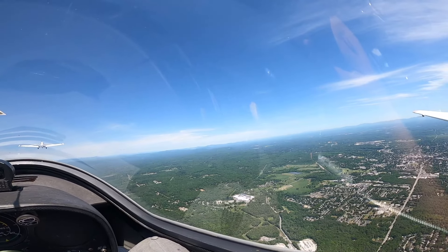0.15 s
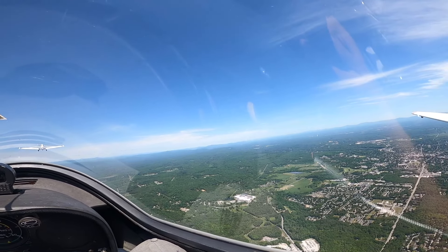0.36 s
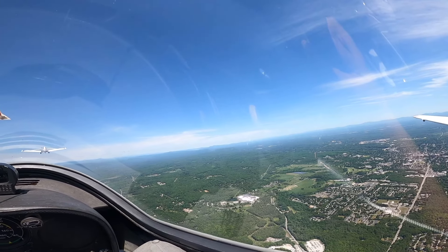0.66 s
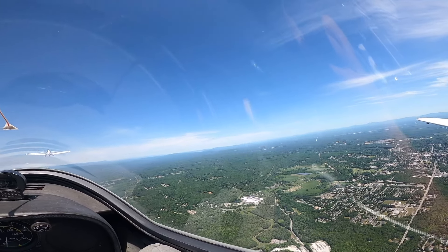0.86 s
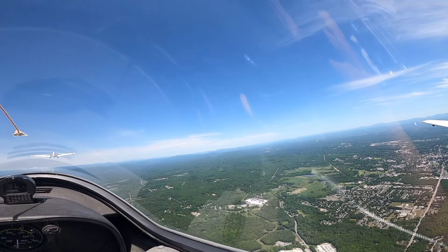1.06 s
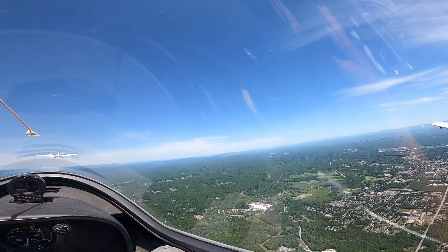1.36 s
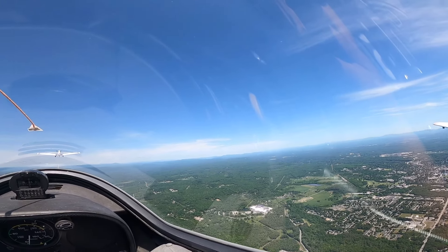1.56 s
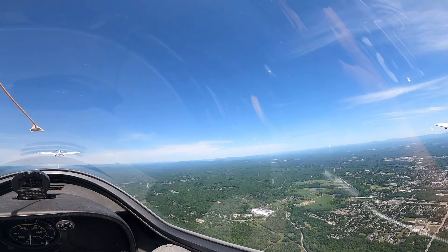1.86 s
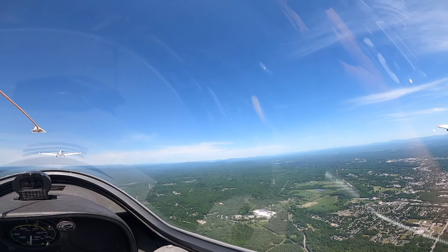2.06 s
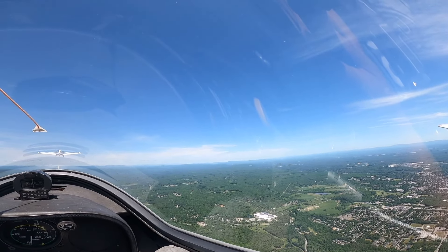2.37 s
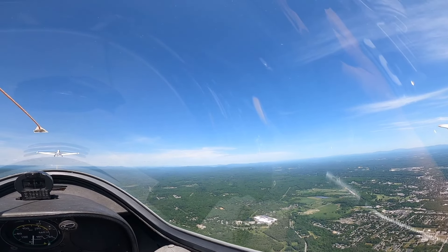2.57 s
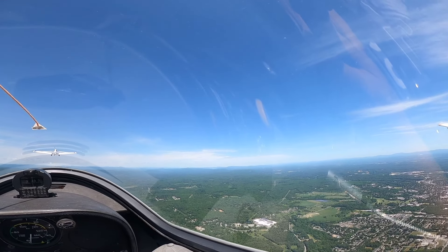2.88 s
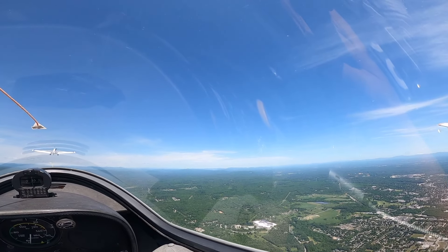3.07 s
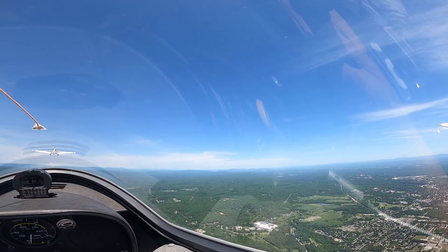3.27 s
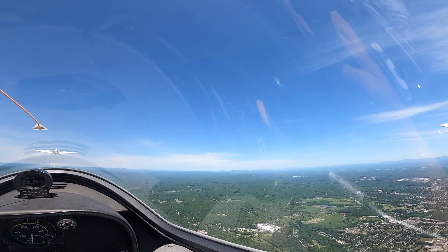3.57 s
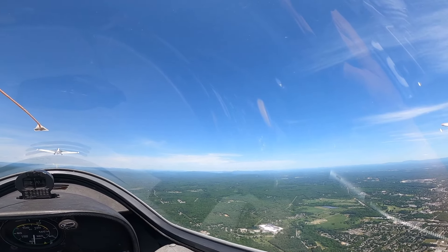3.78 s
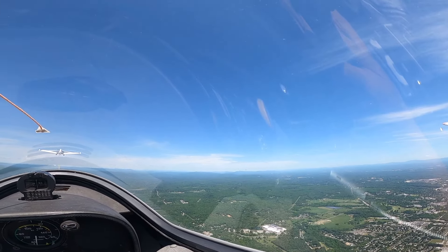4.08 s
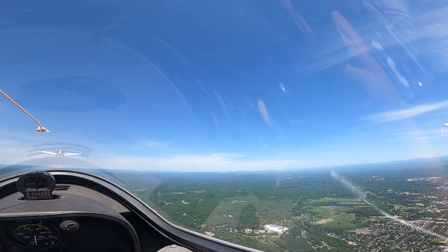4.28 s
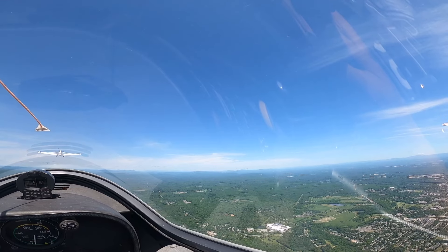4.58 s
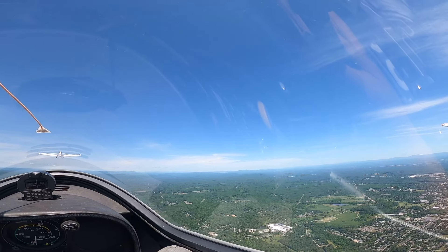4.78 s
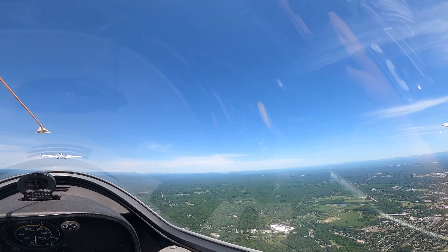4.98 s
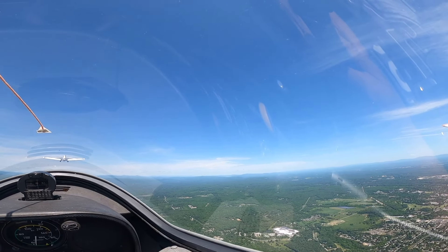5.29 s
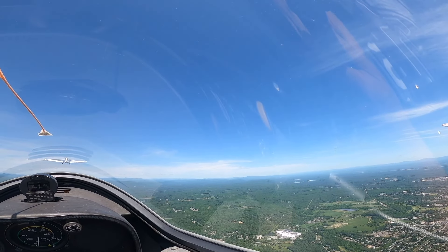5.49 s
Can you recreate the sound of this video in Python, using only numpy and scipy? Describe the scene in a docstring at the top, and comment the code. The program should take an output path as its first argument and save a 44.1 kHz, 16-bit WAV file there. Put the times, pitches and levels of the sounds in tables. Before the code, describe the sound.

A short gust of wind pushes against a glider's hull, then settles into an even, booming rush of air that rises and falls slightly. Thin airy whistling and a fine hiss from the canopy sit above it, while the distant engine of the towing plane is a barely audible low hum. A stereo microphone inside the small cockpit gives an enclosed, bass-heavy sound.

```python
"""Inside a glider cockpit on tow, heard through two closely spaced microphone ports.
The airstream shakes the hull, so the cabin air booms and the panels rush; gaps at the canopy whistle
and small eddies hiss across it. One gust passes at the start, then the air swells gently.
The tow plane's drone sits faintly in the boom; a quick limiter flattens the bass peaks."""
import sys
import numpy as np
from scipy import signal
from scipy.fft import rfft, irfft, next_fast_len
from scipy.io import wavfile
from scipy.ndimage import uniform_filter1d, map_coordinates

SR = 44100
rng = np.random.default_rng(int(sys.argv[2]) if len(sys.argv) > 2 else 0)


def to_wav(s):
    """Save 16-bit WAV."""
    ch = np.atleast_2d(s).T  # columns
    pcm = np.round(np.clip(ch, -1, 1) * 32767)  # PCM
    wavfile.write(sys.argv[1], SR, pcm.astype(np.int16))


N = 248724
T = np.arange(N) / SR
HZ = np.fft.rfftfreq(N, 1 / SR)

# tow plane's engine tones: f/Hz, level/dB
ENGINE_TONES = [(70.5, -41), (113, -29)]
# colour of the low wash: f/Hz, level/dB
WASH_EQ = [(15, -13.5), (50, -8), (85, -16), (120, -11.5), (174, -5.5), (400, -16), (600, -23.5),
           (900, -12), (1180, -14), (1270, -27), (1600, -26.5), (2500, -55.5)]
# colour of the canopy hiss: f/Hz, level/dB
HISS_EQ = [(900, -25), (1250, -5.5), (1400, -1), (1550, -4.5), (2100, -9.5), (2350, -8), (2900, -14.5),
           (3400, -16.5), (4300, -19), (5500, -25), (8000, -33), (9600, -35.5)]
# small cavities around the microphone lift or thin the hiss: f/Hz, width/Hz, level/dB
CAVITY_EQ = [(1590, 80, 0), (1670, 70, -2), (1970, 80, -2), (2150, 80, -2.5), (2300, 80, 0.5),
             (2870, 130, -0.5), (3060, 110, 2.5), (3340, 130, -2), (3600, 260, 1.5), (3920, 240, -2),
             (4350, 260, 1.5), (4570, 110, -1), (4700, 90, 1.5), (4850, 150, -1.5), (5550, 210, 1.5),
             (5840, 320, -0.5)]
# how alike the hiss is at the two ports: f/Hz, correlation
HISS_LIKENESS = [(1250, .85), (1500, .55), (1900, .55), (2400, .85), (3200, .65), (4000, .3), (4600, .4),
                 (6000, .1)]
# where the hiss sits: f/Hz, left-right/dB
HISS_BALANCE = [(1250, -0.5), (2100, 4), (3000, 3.5), (4500, 0.5), (9000, -0.4)]
# edge tones at the canopy gaps: f/Hz, width/Hz, level/dB, left-right/dB
EDGE_TONES = [(887, 39, -5, -1.5), (914, 40, -2, 3.5), (939.6, 40, -3, 3), (1019, 76, -4, 1.5),
              (1180.6, 53, -5, 2.5), (1210, 50, -9.5, 3)]
# resonances of the small panels: f/Hz, width/Hz, level/dB, left-right/dB
SMALL_PANEL_MODES = [(549, 213, -14.5, 1.5), (662, 31, -17.5, 1), (730, 60, -13.5, 5),
                     (804, 34, -16.5, 4.5)]
# resonances of the large panels: f/Hz, width/Hz, level/dB, left-right/dB
LARGE_PANEL_MODES = [(242, 29.7, 0, 2), (294.3, 53, -2.5, -0.5), (358.6, 28, -8.5, 1.5),
                     (424, 32.6, -9, .5)]
# flexing modes of the hull: f/Hz, width/Hz, level/dB, left-right/dB
HULL_MODES = [(38, 37, -7.5, -1), (55.5, 24, 2, 0.5), (72.5, 12, -1.5, -.5)]
# resonances of the cabin air: f/Hz, width/Hz, level/dB, left-right/dB
CABIN_MODES = [(116.5, 14.9, 1, -1), (136, 41, -8, 0.5), (163.2, 24.5, -2.5, -1.5), (178, 21, -9.5, -3.5)]
# the opening gust and its small second puff: t/s, level/dB
GUST_RIDE = [(0, 4), (.18, 3.5), (.27, 2.5), (.36, 0), (.46, 1), (.56, 2.5), (.63, .5), (.85, -.5),
             (1.05, 0)]
# gentle swells of the airstream after it: t/s, level/dB
SWELL_RIDE = [(1.05, 0), (1.3, -1.3), (1.5, 0), (1.7, -0.6), (1.9, 0.4), (2.3, -0.8), (2.6, 0), (2.9, 1),
              (3.3, -0.85), (3.65, -0.5), (3.9, 1), (4.15, 0), (4.55, 0.9), (4.85, 0), (5.2, 0.76),
              (5.64, -.5)]
# how far the left port leads the right: f/Hz, phase/rad
LEFT_LEAD = [(100, -0.046), (170, 0.086), (280, 0.47), (480, 0.47), (660, 0.79), (880, -0.39), (1300, -.1),
             (2000, -0.68), (3500, -.7), (4800, 1.2)]
# notches where standing waves cancel at the ports: f/Hz, width/Hz, left/dB, right/dB
PORT_NOTCHES = [(85.5, 15, -7.5, -8.5), (219.3, 18, -3.5, -5), (845, 26, -2.5, -7.5), (1105, 60, -0.5, -2),
                (1450, 50, -2.5, -5.5), (1518, 60, -3, -6)]
# the microphone's top-end roll-off: f/Hz, level/dB
MIC_ROLLOFF = [(9600, 0), (10700, -10), (11800, -10), (13200, -18), (14800, -33)]


def gain_of(db):
    """Decibels to gain."""
    return 10 ** (np.asarray(db) / 20)


def unit_rms(x):
    """Scales to rms 1."""
    return x / np.sqrt(np.mean(x ** 2) + 1e-20)


def curve(points):
    """Draws a table across the spectrum, on a log frequency scale."""
    f, value = np.transpose(points)
    return np.interp(np.log(HZ + 1), np.log(f + 1), value)


def bell(hz, width):
    """A bell-shaped EQ band, 1 at its centre."""
    return np.exp(-(2 * (HZ - hz) / width) ** 2)


def drift(span):
    """A slow random modulator: noise smoothed twice over span samples."""
    return unit_rms(uniform_filter1d(uniform_filter1d(rng.standard_normal(N), span), span))


def airstream(level_db, gust, swell, rise_db_per_s, wander_db):
    """A layer's fader ride: its shares of gust and swells, a slow ramp and a random wander."""
    wander = drift(round(0.39 * SR))
    air_db = gust * np.interp(T, *np.transpose(GUST_RIDE))
    air_db += swell * np.interp(T, *np.transpose(SWELL_RIDE))
    return gain_of(level_db + air_db + rise_db_per_s * T + wander_db * wander)


def turbulence(patchy_db):
    """Spectrum of white noise with drifting patches of more and less energy."""
    real, imag, patches = rng.standard_normal((3, 513, N // 256 + 5))
    patches = unit_rms(uniform_filter1d(uniform_filter1d(patches, 10, axis=0), 14, axis=1))
    frames = (real + 1j * imag) * gain_of(patchy_db * patches)
    return rfft(signal.istft(frames, nperseg=1024, noverlap=768)[1][:N])


def ports(left, right):
    """Spectra to stereo at rms 1; the ports lie apart, so one leads and each has its own notches."""
    half_lead = np.exp(0.5j * curve(LEFT_LEAD))
    notches_db = sum(np.outer(dbs, bell(hz, width)) for hz, width, *dbs in PORT_NOTCHES)
    return unit_rms(irfft(gain_of(notches_db) * [left * half_lead, right / half_lead], N))


def ringing(modes, steepness, patchy_db, top_hz):
    """One turbulent drive, fading above top_hz, rings resonances; both ports hear the same motion."""
    drive = turbulence(patchy_db) / (1 + (HZ / top_hz) ** 4)
    power = np.zeros((2, len(HZ)))
    for hz, width, db, pan_db in modes:
        peak = (1 + (2 * (HZ - hz) / width) ** 2) ** -steepness
        power += gain_of([[db + pan_db / 2], [db - pan_db / 2]]) ** 2 * peak
    return ports(*(np.sqrt(power) * drive))


def tow_plane():
    """Far engine tones that waver in pitch and strength through rough air."""
    drone = np.zeros(N)
    for hz, db in ENGINE_TONES:
        pitch = hz * (1 + 0.01501 * drift(6000))
        gain = gain_of(db + 3 * drift(6000))
        drone += gain * np.sqrt(2) * np.sin(2 * np.pi * np.cumsum(pitch) / SR)
    return drone


def eddy_wash():
    """A wide, low bed of eddies from many directions, unrelated at the two ports."""
    colour = gain_of(curve(WASH_EQ))
    left, right = turbulence(patchy_db=1), turbulence(patchy_db=1)
    return gain_of(-37.5) * ports(colour * left, colour * right)


def canopy_hiss():
    """Small eddies all over the canopy; the stereo image widens towards the top."""
    ride = airstream(-39.4, gust=1.02, swell=0.7, rise_db_per_s=0.1834, wander_db=0.2)
    likeness = curve(HISS_LIKENESS)
    left, unrelated = turbulence(patchy_db=0), turbulence(patchy_db=-0.5)
    right = likeness * left + np.sqrt(1 - likeness ** 2) * unrelated
    cavities_db = sum(db * bell(hz, width) for hz, width, db in CAVITY_EQ)
    colour = gain_of(curve(HISS_EQ) + cavities_db)
    pan = gain_of(curve(HISS_BALANCE) / 2)
    return ride * ports(colour * pan * left, colour / pan * right)


def gap_whistles():
    """Air leaking through canopy gaps sings breathy edge tones that waver and creep up in pitch."""
    ride = airstream(-32.7, gust=-0.04, swell=0.7, rise_db_per_s=0.14, wander_db=0.2)
    tones = ringing(EDGE_TONES, steepness=1.88, patchy_db=0.93, top_hz=1800)
    climb_per_s, waver = 0.001201, 0.004025  # varispeed, as shares of the pitch
    playhead = np.cumsum(1 + climb_per_s * (T - T.mean()) + waver * drift(9000))
    return ride * np.array([map_coordinates(side, [playhead], order=3, mode="mirror") for side in tones])


def panel_rush():
    """The airstream rings the panels: large ones give the rush its body, small ones its mids."""
    body = airstream(-27.5, gust=1.02, swell=1.01, rise_db_per_s=-0.1, wander_db=0.5)
    body = body * ringing(LARGE_PANEL_MODES, steepness=1.2, patchy_db=0.68, top_hz=1500)
    mids = airstream(-35, gust=0.64, swell=0.9, rise_db_per_s=0.08, wander_db=0.23)
    mids = mids * ringing(SMALL_PANEL_MODES, steepness=1.17, patchy_db=0.66, top_hz=1500)
    return body + mids


def hull_buffet():
    """The hull flexes in rough air: a sub rumble that slowly builds."""
    ride = airstream(-30.5, gust=0.8, swell=1.01, rise_db_per_s=1.0, wander_db=1)
    return ride * ringing(HULL_MODES, steepness=0.95, patchy_db=1.5, top_hz=150)


def cabin_boom():
    """The shaking hull rings the cabin air: the boom that carries the scene."""
    ride = airstream(-16, gust=0.5, swell=0, rise_db_per_s=-0.1, wander_db=0.23)
    return ride * ringing(CABIN_MODES, steepness=1.296, patchy_db=0.5, top_hz=393)


def scene():
    """The layers that ride the airstream, over a bed of wash and engine drone."""
    airborne = hull_buffet() + cabin_boom() + panel_rush() + gap_whistles() + canopy_hiss()
    return airborne + eddy_wash() + tow_plane()


def record(dry):
    """Low cut and top roll-off, a quick limiter on the bass alone, then a steep high cut."""
    low_cut_hz, crossover_hz, high_cut_hz = 19, 233, 14900
    threshold_db, release_db_per_s, squash, makeup_db = -13, 260, 0.69, 2.5
    spectrum = rfft(dry) * gain_of(curve(MIC_ROLLOFF)) * HZ ** 2 / (HZ ** 2 + low_cut_hz ** 2)
    bass_share = 1 / (1 + (HZ / crossover_hz) ** 4)
    bass, rest = irfft(spectrum * bass_share, N), irfft(spectrum * (1 - bass_share), N)
    envelope = abs(signal.hilbert(bass.mean(0), next_fast_len(N))[:N])
    release_db = release_db_per_s * T
    held_db = np.maximum.accumulate(20 * np.log10(envelope + 1e-9) + release_db) - release_db
    over_db = uniform_filter1d(np.maximum(held_db - threshold_db, 0), 150)
    limited = bass * gain_of(makeup_db - squash * over_db) + rest
    high_cut = signal.firwin(511, high_cut_hz, window=("kaiser", 9), fs=SR)
    return signal.oaconvolve(limited, high_cut[None], "same")


dry = scene()
out = record(dry)
to_wav(out)
```